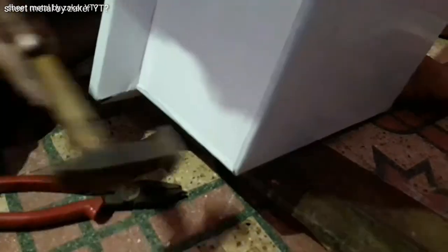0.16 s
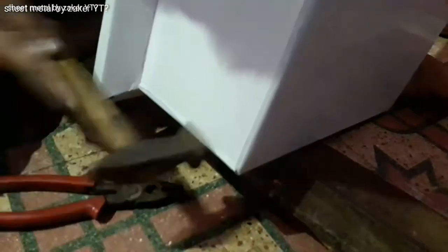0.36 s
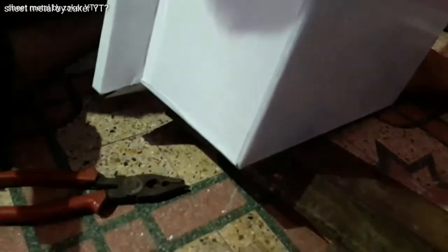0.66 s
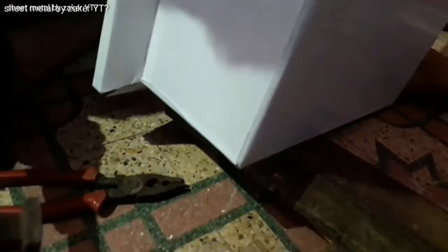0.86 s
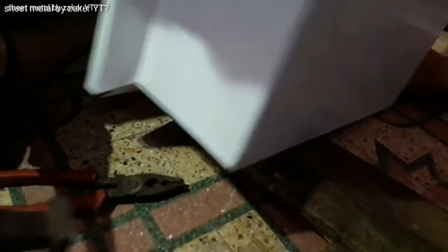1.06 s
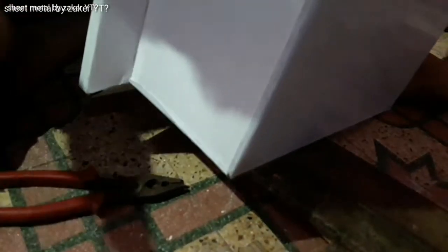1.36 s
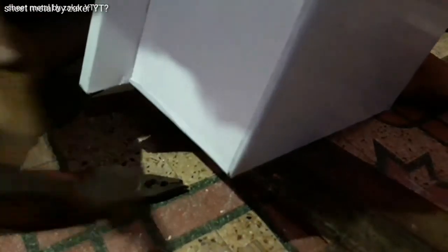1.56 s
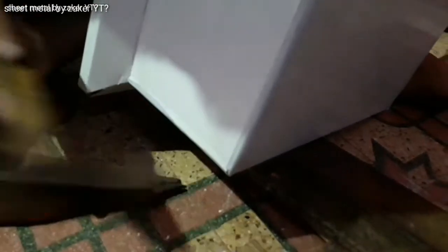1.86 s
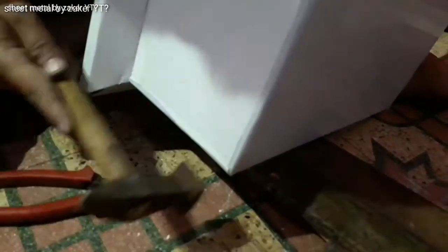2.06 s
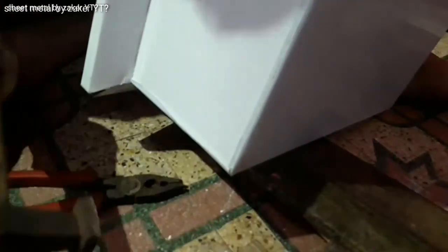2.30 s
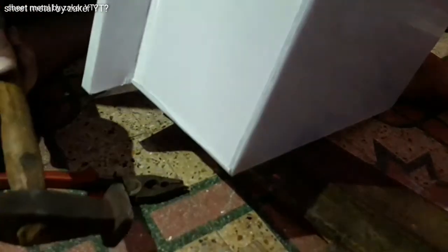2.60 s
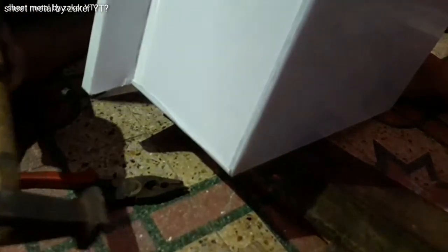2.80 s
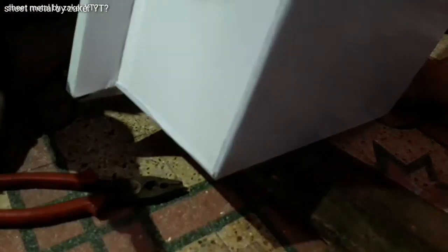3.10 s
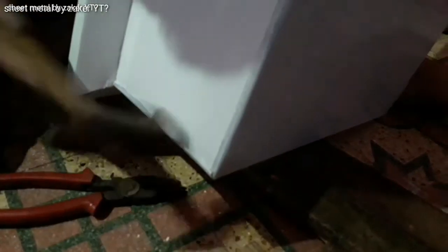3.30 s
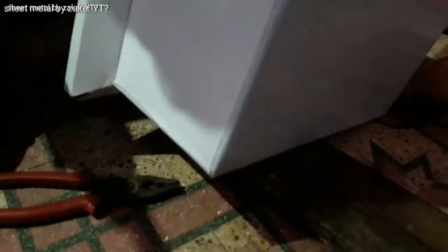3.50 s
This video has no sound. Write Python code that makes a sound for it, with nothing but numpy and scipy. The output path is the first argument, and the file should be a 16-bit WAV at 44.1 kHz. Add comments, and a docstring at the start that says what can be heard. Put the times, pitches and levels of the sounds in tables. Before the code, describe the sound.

A steel hammer hits a sheet-metal box with sharp, briefly ringing crashes, lightly at 0.3 seconds and harder at 0.5. The box scrapes faintly and knocks on a steel bar. Four strong blows follow at about 1.1, 1.5, 1.8 and 2.1 seconds, then light settling knocks and a soft scrape. Two more land at 3.1 and 3.4, the last with a brighter steel ring. Quiet, low room noise lies underneath.

```python
"""A steel hammer closes the seam of a sheet-metal box that rests on a steel bar in a small workshop.
Each blow shakes the sheet at many pitches at once (its modes), making a crash whose treble dies first.
The solid steel rings along, mostly faintly. Between blows the box is shifted: it scrapes along
the bar and knocks lightly against it. Under it all lies the quiet, low noise of the room."""
import sys
import numpy as np
from scipy import signal
from scipy.io import wavfile
from scipy.ndimage import uniform_filter1d

SR = 44100
rng = np.random.default_rng(int(sys.argv[2]) if len(sys.argv) > 2 else 0)


def waveform_to_disk(signal):
    """Save audio, clipped to [-1, 1], as 16-bit WAV at the path in sys.argv[1]."""
    frames = np.transpose(np.atleast_2d(signal))
    scaled = np.clip(frames, -1, 1) * 32767
    samples = np.round(scaled).astype(np.int16)
    wavfile.write(sys.argv[1], SR, samples)


N = 160965

# Levels in the tables are relative. A ring time (t60) is how long a sound takes to fall by 60 dB.
# tone colour of the room's noise: f/Hz, level/dB
ROOM_SPECTRUM = [(30, -21), (100, -2.5), (240, 1), (600, -6.5), (1500, -20.5), (5000, -27), (9000, -39),
                 (15000, -49)]
# tone colour of the box rubbing on the bar: f/Hz, level/dB
SCRAPE_SPECTRUM = [(100, -17.5), (240, 2.5), (400, -34.5), (620, 13.5), (900, -4), (1350, 5), (1650, 6),
                   (2200, 0), (3900, 5), (7500, -1.5), (10000, -15), (15000, -17)]
# shoves of the box: t/s at top speed, rise/s, fade/s, level/dB, rasp against the rub/dB
SHOVES = [(0.02, 0.086, 0.29, -48.5, -16.5), (0.262, 0.046, .02, -46.5, 1),
          (0.705, 0.024, 0.057, -45.5, -0.5), (0.775, 0.055, 0.073, -45, -4.5),
          (0.946, 0.021, 0.016, -41, -5), (1.125, 0.038, 0.023, -34.5, -13.5),
          (2.881, 0.029, 0.11, -41.5, -1), (3.034, 0.012, 0.056, -34.5, -12)]
# tone colour of the sheet's crash, a crowd of close modes: f/Hz, level/dB
SHEET_SPECTRUM = [(35, -35.5), (60, -25), (95, -1), (125, -8), (200, -0.5), (320, 1.5), (430, -4),
                  (680, 5.5), (900, -6.5), (1150, 2), (1400, -8), (1650, -1), (2300, -6), (4200, -0.5),
                  (6000, -4.5), (8000, -10), (9500, -27.5), (12500, -12.5), (16000, -45.5)]
# how long the crash rings: f/Hz, t60/s
SHEET_RING_TIMES = [(80, 0.7), (240, 0.71), (560, 0.51), (1470, 0.37), (2600, .27), (5000, 0.22),
                    (10000, 0.23), (15000, 0.18)]
# strongest modes of the box's panels: f/Hz, level/dB, t60/s
PANEL_MODES = [(104, -42, .7), (226, -30, .8), (241, -24, .95), (288, -31, .6), (381, -26, .55),
               (462, -27, .55), (501, -24, .55), (587, -29, .5), (667, -28, .5), (750, -28, .5),
               (797, -25, .45), (1082, -30, .43), (1206, -28, .43), (1625, -28, .36)]
# modes of the solid steel: f/Hz, level/dB, t60/s
STEEL_MODES = [(2510, -27, .25), (3010, -24, .24), (3268, -25, .25), (4022, -20, .29), (4121, -26, .27),
               (5184, -32, .42), (5826, -27, .34), (5960, -29, .34), (6024, -26, .37), (6589, -31, .38)]
# knocks on the bar: t/s, bass/dB, body/dB, middle/dB, treble/dB, ring time as a share of a blow's
BOX_KNOCKS = [(0.05, -14.5, -18, -28.5, -25, 0.43), (0.834, -9, -14.5, -21.5, -22.5, 0.89),
              (0.932, -14, -17.5, -19.5, -30, 1), (1.159, -6, 6, 3.5, -15, 0.42),
              (1.865, -4, -1.5, 2.5, -14, 0.88), (2.338, -12, -25, -25, -26.5, 1),
              (2.485, -22, -41, -35.5, -42.5, 1), (2.551, -34, -38, -38, -43, 0.98),
              (2.639, -22.5, -22.5, -31, -33, 1)]
# blows: t/s, bass/dB, body/dB, middle/dB, treble/dB, steel ring/dB, wait until a hand damps the sheet/s
HAMMER_BLOWS = [(0.2642, -6, -6, -9, -14.5, -41, 0.11), (0.452, -2, 0, 1.5, -2.5, -19.5, 0.69),
                (1.1364, 1, 0.5, 4.5, -2, -34, 0.67), (1.548, 0, -1, 3.5, -1.5, -18, 0.86),
                (1.8423, 0.5, -0.5, 2.5, -1.5, -21.5, 0.85), (2.104, -2, -0.5, 2.5, -3.5, -20, 0.54),
                (3.0591, 3.5, 2, 5, -2, -19.5, 0.71), (3.3924, 1, -2, 5.5, 0, -1, 0.71)]

COLOUR_HZ = [180, 500, 1400, 4500]   # where bass, body, middle and treble sit
BAND_EDGES_HZ = np.geomspace(25, 17000, 39)
BAND_HZ = np.sqrt(BAND_EDGES_HZ[1:] * BAND_EDGES_HZ[:-1])
RING_T = np.arange(SR) / SR   # the second that follows a hit


def from_db(db):
    """Turn decibels into a gain to multiply by."""
    return 10 ** (np.asarray(db) / 20)


def at_hz(points, hz):
    """Read between the rows of a table, with every octave equally wide."""
    f, value = np.transpose(points)
    return np.interp(np.log(hz), np.log(f), value)


def add(out, start_s, sound):
    """Mix a sound in at its start time."""
    i = int(start_s * SR)
    out[i:i + len(sound)] += sound[:N - i]


def band_pass(sound, edges_hz):
    """Keep the part of a sound between two frequencies."""
    return signal.sosfilt(signal.butter(2, edges_hz, "band", fs=SR, output="sos"), sound)


def noise_bands(size):
    """Equally strong bands of noise, each a quarter of an octave wide."""
    white = rng.standard_normal((2, size + SR // 4))   # extra length lets the filters settle
    bands = np.array([band_pass(white[k % 2], BAND_EDGES_HZ[k:k + 2])[-size:]
                      for k in range(len(BAND_HZ))])
    return bands / bands.std(axis=1, keepdims=True)


def band_gains(spectrum):
    """Share a total power of 1 among the bands to give a tone colour."""
    gain = from_db(at_hz(spectrum, BAND_HZ)) * np.sqrt(np.diff(BAND_EDGES_HZ))
    return gain / np.linalg.norm(gain)


def decay(t60, wait_s=0):
    """Hold steady for wait_s, then fall by 60 dB every t60 seconds."""
    return np.exp(-np.log(1000) * np.maximum(RING_T - wait_s, 0) / t60)


def room_tone(level_db=-52):
    """The workshop's steady, low background noise."""
    return from_db(level_db) * (band_gains(ROOM_SPECTRUM) @ noise_bands(N))


def scrapes(rasp_hz=(2900, 4500), grain_s=0.003, grain_db=1):
    """Grainy rubbing swells and fades with each shove; a catching edge adds a rasp."""
    t, out = np.arange(N) / SR, np.zeros(N)
    rub = band_gains(SCRAPE_SPECTRUM) @ noise_bands(N)
    rasp = band_pass(rng.standard_normal(N), rasp_hz)
    rasp /= rasp.std()
    for peak_s, rise_s, fade_s, db, rasp_db in SHOVES:
        speed = np.exp(-np.maximum((peak_s - t) / rise_s, (t - peak_s) / fade_s))
        out += from_db(db) * speed * (rub + speed * from_db(rasp_db) * rasp)
    grain = uniform_filter1d(rng.standard_normal(N), int(grain_s * SR))
    return out * from_db(grain_db * grain / grain.std())


def modes(table, strength_db, ring_scale=1, detune=0, spread_db=0.52):
    """Struck metal rings as fading sine waves, a little different in strength each time."""
    hz, db, t60 = np.transpose(table)
    hz = hz * (1 + detune * rng.standard_normal(len(hz)))
    gain = from_db(db + strength_db + spread_db * rng.standard_normal(len(hz)))
    phase = rng.uniform(0, 2 * np.pi, (len(hz), 1))
    sines = np.sin(2 * np.pi * hz[:, None] * RING_T + phase)
    return gain @ (sines * decay(ring_scale * t60[:, None]))


def build_up(hz=950):
    """Bending waves take a moment to fill the sheet; high ones spread faster."""
    rise_s = 0.0017 * (950 / hz) ** 0.62
    return 1 - np.exp(-RING_T / rise_s)


def struck_sheet(noise, strengths_db, ring_scale=1, crash_db=-10, panel_db=0.5):
    """One hit: noise bands swell and die like a crowd of modes, and the strong panel modes ring too."""
    colour = list(zip(COLOUR_HZ, strengths_db))
    t60 = ring_scale * at_hz(SHEET_RING_TIMES, BAND_HZ)[:, None]
    envelope = build_up(BAND_HZ[:, None]) * decay(t60)
    bands = noise * envelope
    gain = band_gains(SHEET_SPECTRUM) * from_db(crash_db + at_hz(colour, BAND_HZ))
    # each band gets its share of the energy, however the noise happens to fall
    evening_out = np.linalg.norm(envelope, axis=1) / np.linalg.norm(bands, axis=1)
    crash = (gain * evening_out) @ bands
    mode_db = panel_db + at_hz(colour, np.array(PANEL_MODES)[:, 0])
    panel = modes(PANEL_MODES, mode_db, ring_scale, detune=0.0042)   # pitch shifts with spot and grip
    return crash + build_up() * panel


def knocks():
    """The box bounces on the bar after two heavy blows, and settles on it with light touches."""
    out = np.zeros(N)
    for start_s, *strengths_db, ring_scale in BOX_KNOCKS:
        add(out, start_s, struck_sheet(noise_bands(SR), strengths_db, ring_scale))
    return out


def sheet_shimmer(count=260, level_db=-11.5, ring_scale=0.92):
    """Scattered high modes of the sheet stand out from the crash."""
    hz = np.geomspace(1700, 14000, count) * rng.uniform(.99, 1.01, count)
    gain = from_db(at_hz(SHEET_SPECTRUM, hz) - rng.uniform(-1.4, 1, count)) * np.sqrt(hz)
    db = 20 * np.log10(gain / np.linalg.norm(gain))
    high_modes = np.column_stack([hz, db, at_hz(SHEET_RING_TIMES, hz)])
    return build_up(COLOUR_HZ[-1]) * modes(high_modes, level_db, ring_scale)


def crack(gain_db=-3, fade_s=0.008, band_hz=(2400, 7580)):
    """The short, bright snap of steel meeting steel."""
    burst = rng.standard_normal(SR) * np.exp(-RING_T / fade_s) + 1e-18   # tiny offset keeps filtering fast
    return from_db(gain_db) * build_up() * band_pass(burst, band_hz)


def hammer(same_share=0.23, damped_t60_s=0.17, steel_boost_db=0.5):
    """Blows land on slightly different spots of the seam; a hand damps the sheet but not the steel."""
    out = np.zeros(N)
    same_noise = noise_bands(SR)   # the part of the crash that every blow shares
    shimmer = sheet_shimmer()
    for start_s, bass_db, body_db, middle_db, treble_db, steel_db, wait_s in HAMMER_BLOWS:
        noise = np.sqrt(same_share) * same_noise + np.sqrt(1 - same_share) * noise_bands(SR)
        sheet = struck_sheet(noise, (bass_db, body_db, middle_db, treble_db))
        sheet += from_db(treble_db) * (crack() + shimmer)
        hand = decay(damped_t60_s, wait_s)
        steel = modes(STEEL_MODES, steel_boost_db + steel_db)
        add(out, start_s, sheet * hand + steel)
    return out


def scene():
    """Blows, knocks and scrapes over the quiet workshop, in one channel."""
    return (room_tone() + hammer() + knocks() + scrapes())[None]


def record(dry, ceiling=1.18, cutoff_hz=15600):
    """Round off the loudest peaks and cut the highest treble."""
    rounded = ceiling * np.tanh(dry / ceiling)
    low_pass = signal.ellip(10, .1, 80, cutoff_hz, fs=SR, output="sos")
    return signal.sosfilt(low_pass, rounded)


dry = scene()
out = record(dry)
waveform_to_disk(out)
```